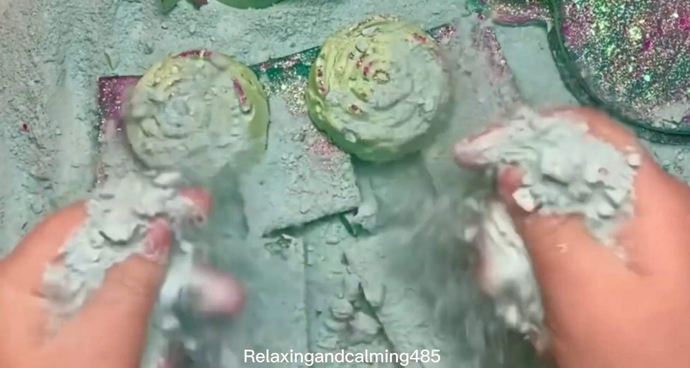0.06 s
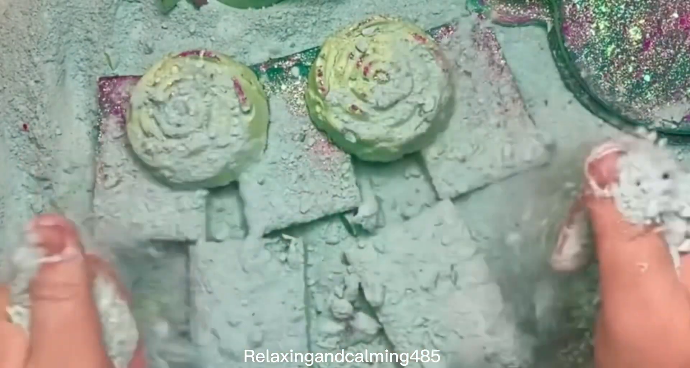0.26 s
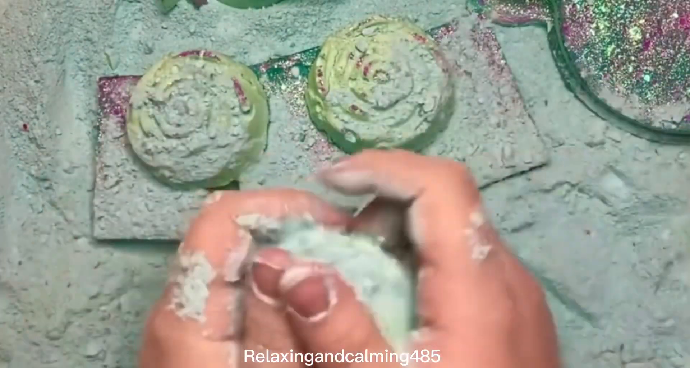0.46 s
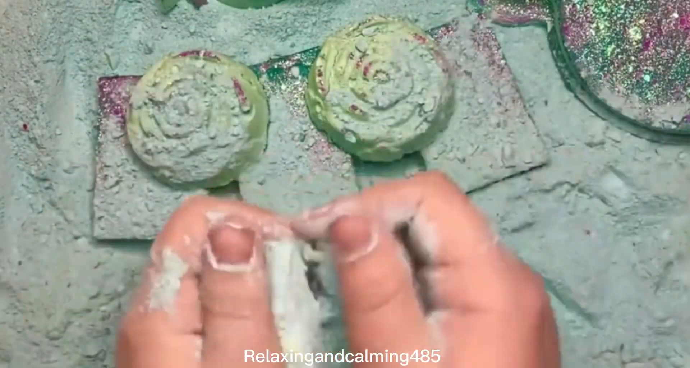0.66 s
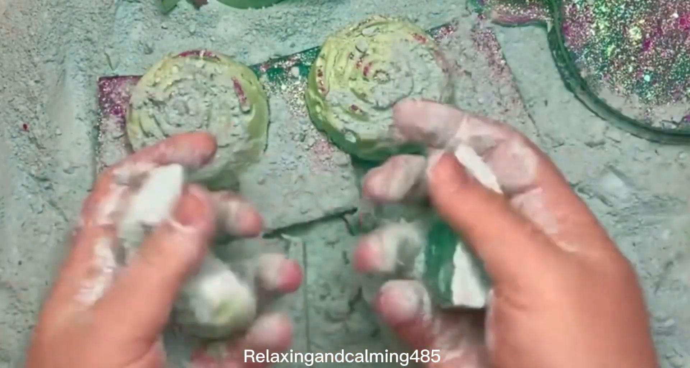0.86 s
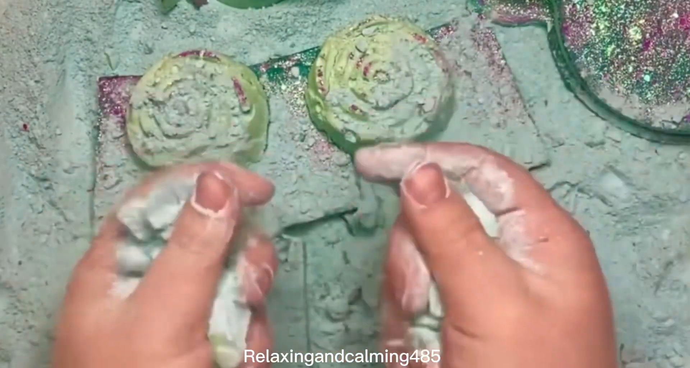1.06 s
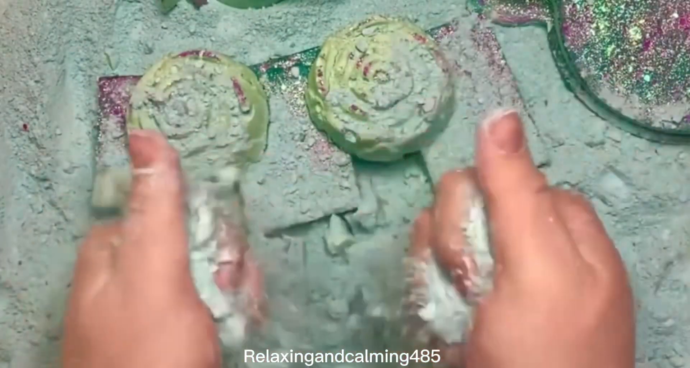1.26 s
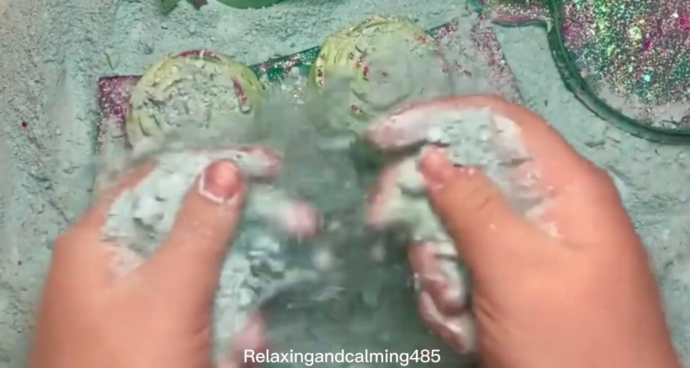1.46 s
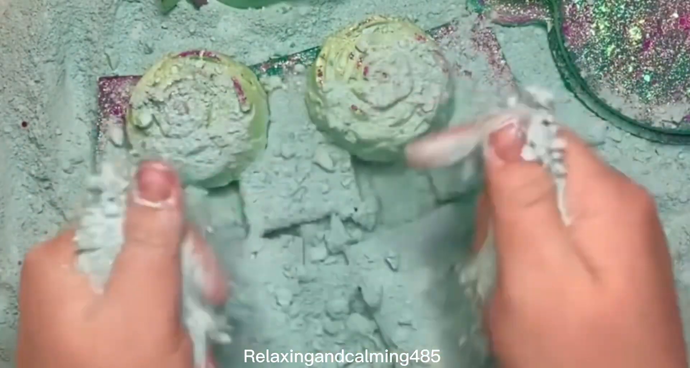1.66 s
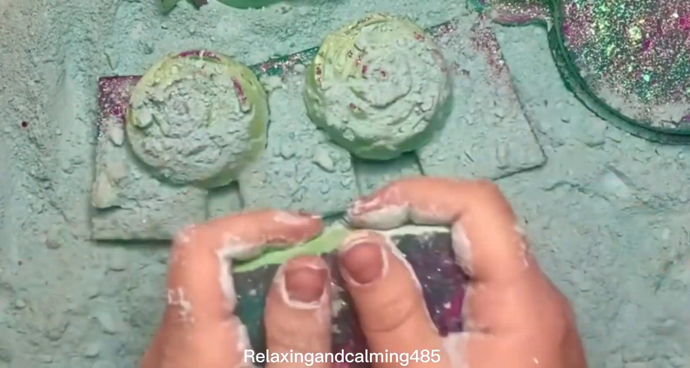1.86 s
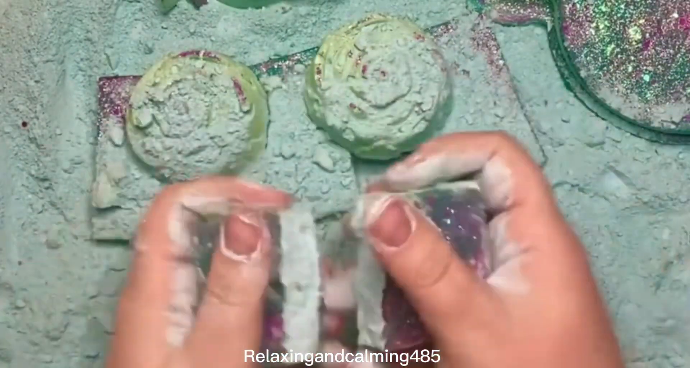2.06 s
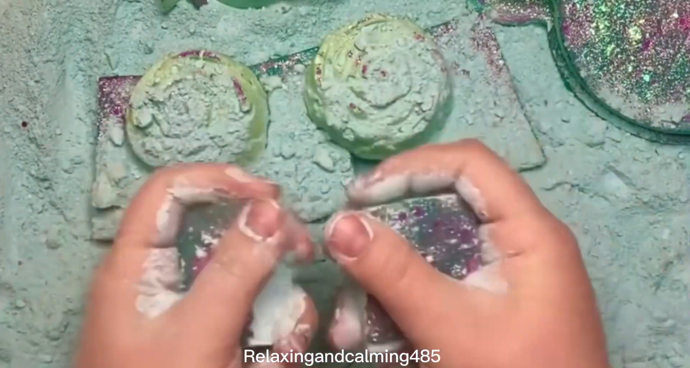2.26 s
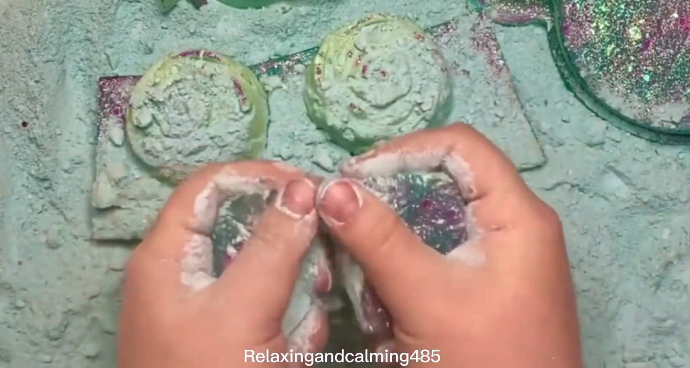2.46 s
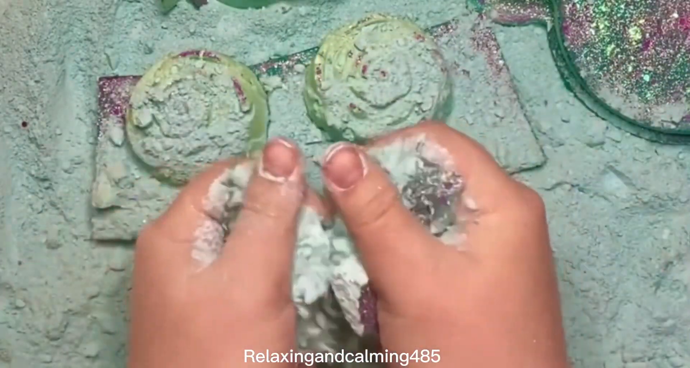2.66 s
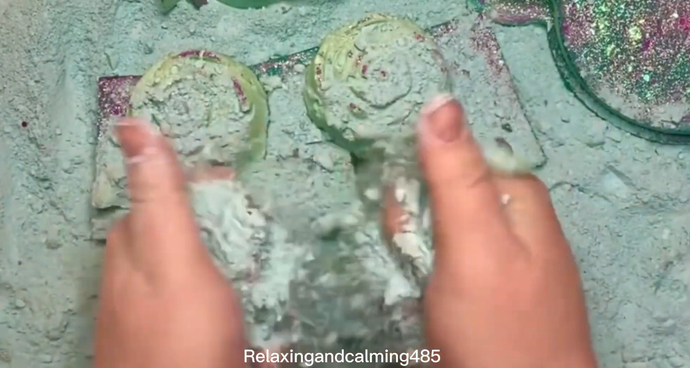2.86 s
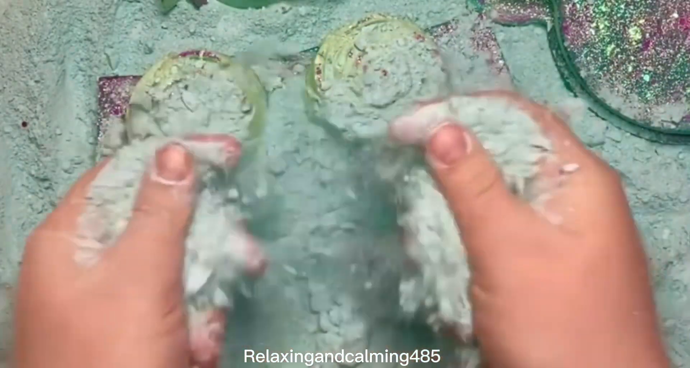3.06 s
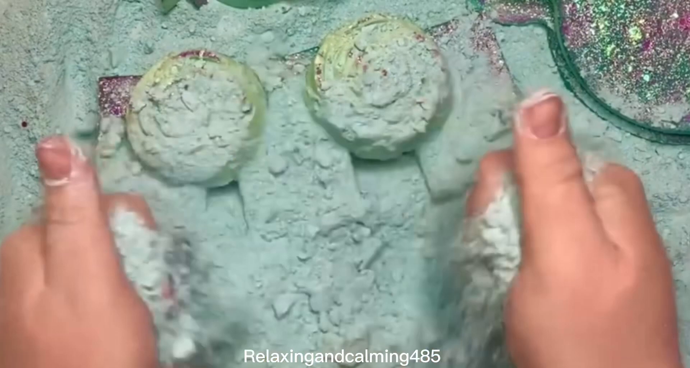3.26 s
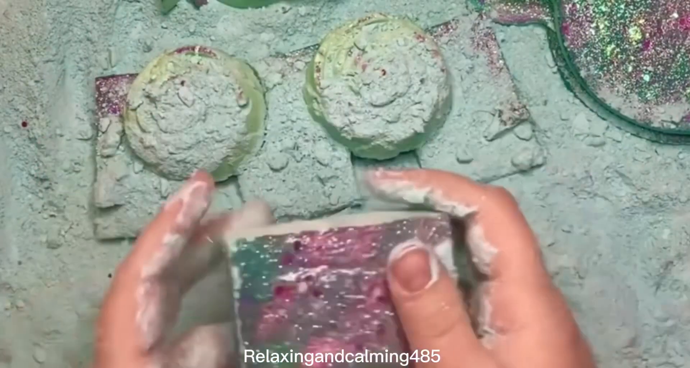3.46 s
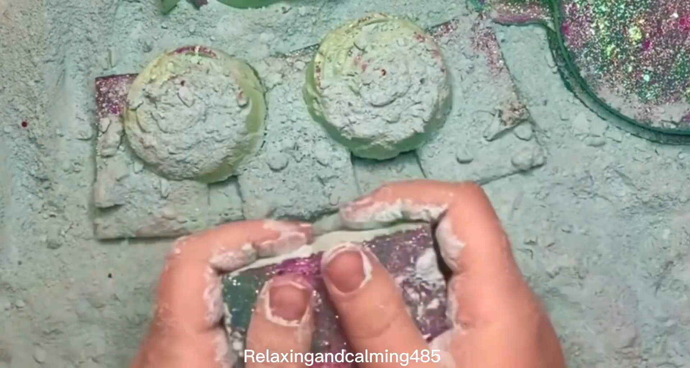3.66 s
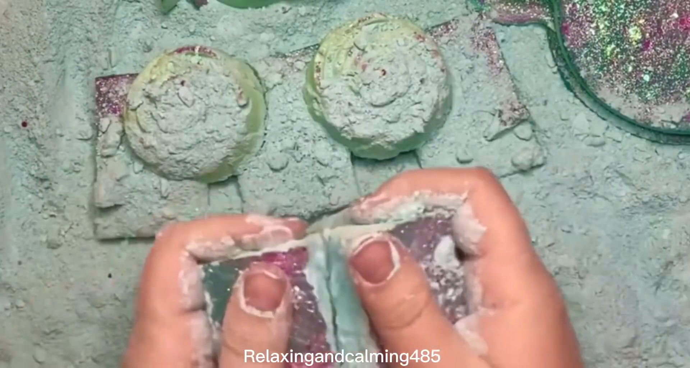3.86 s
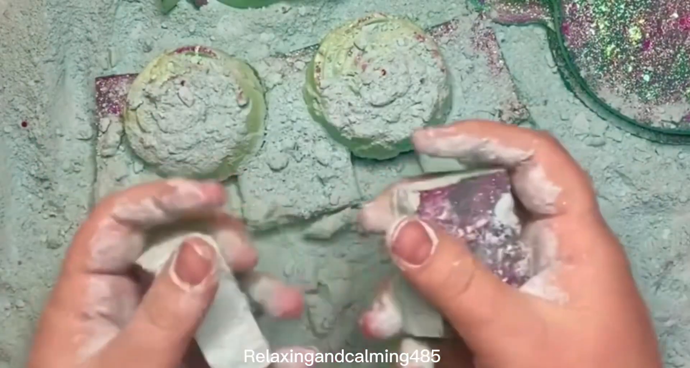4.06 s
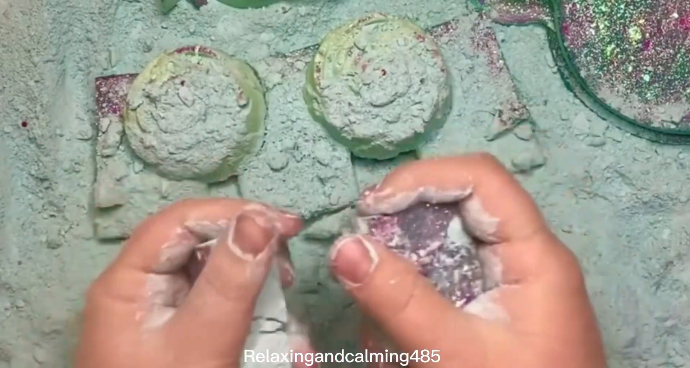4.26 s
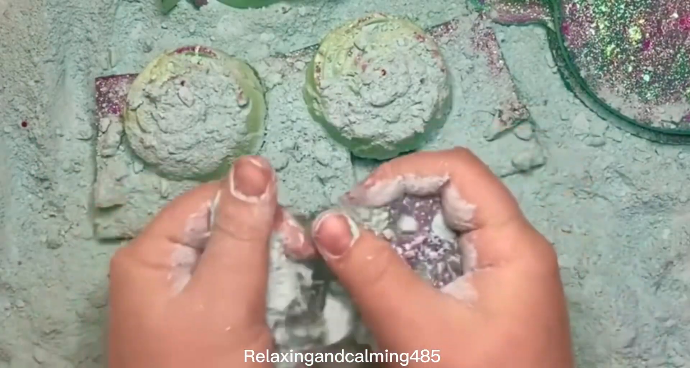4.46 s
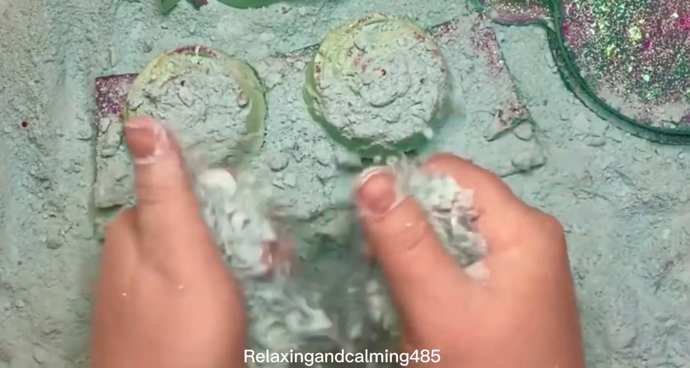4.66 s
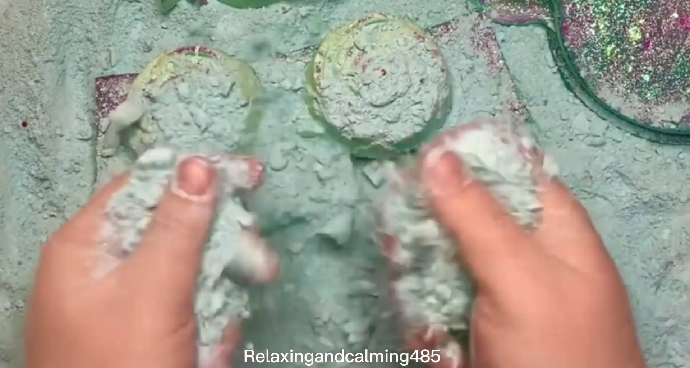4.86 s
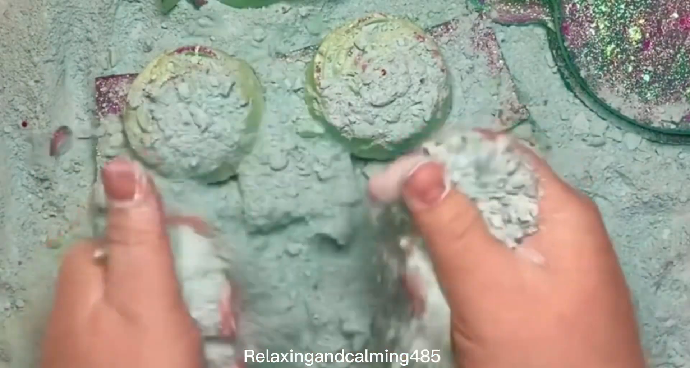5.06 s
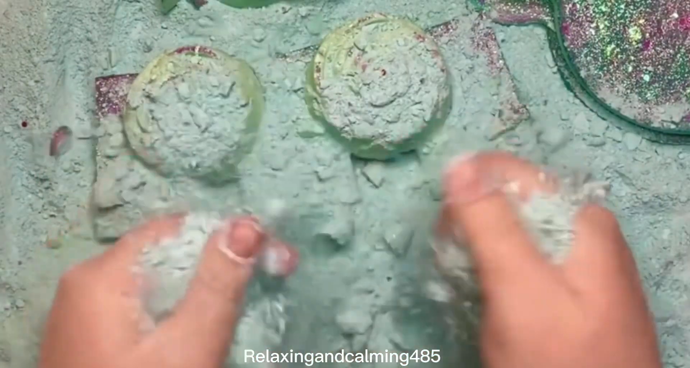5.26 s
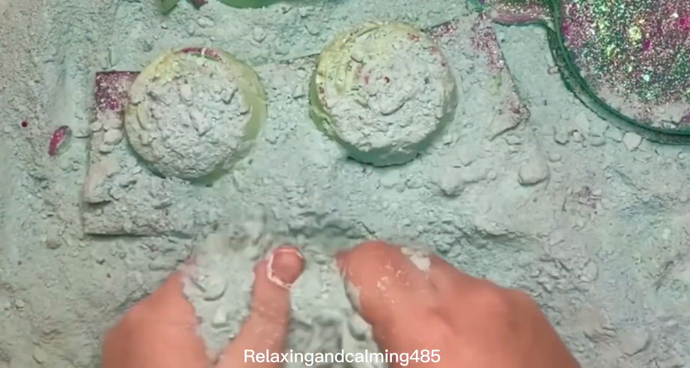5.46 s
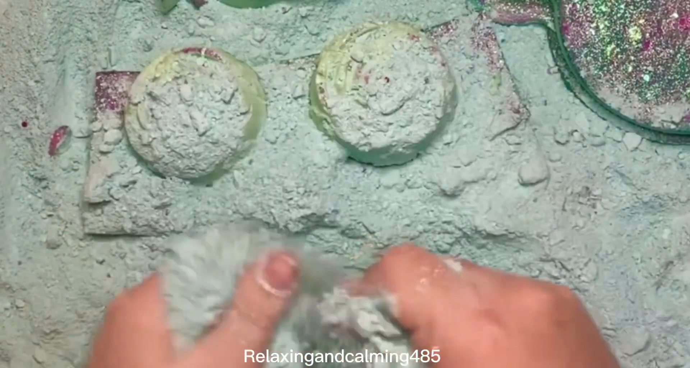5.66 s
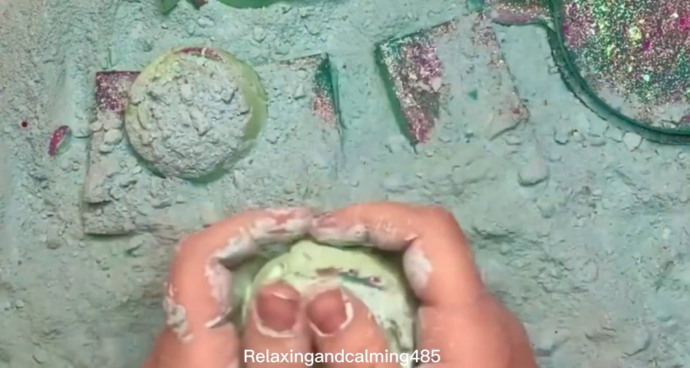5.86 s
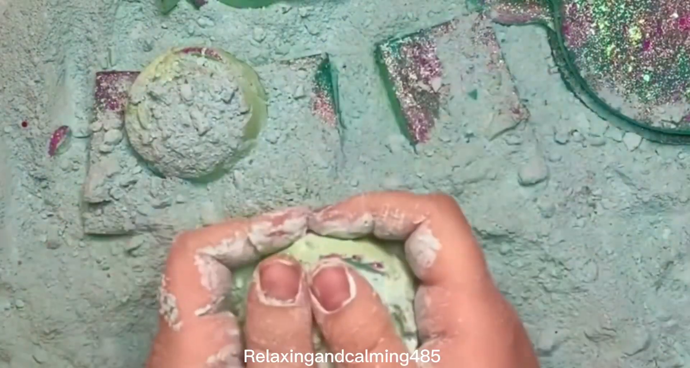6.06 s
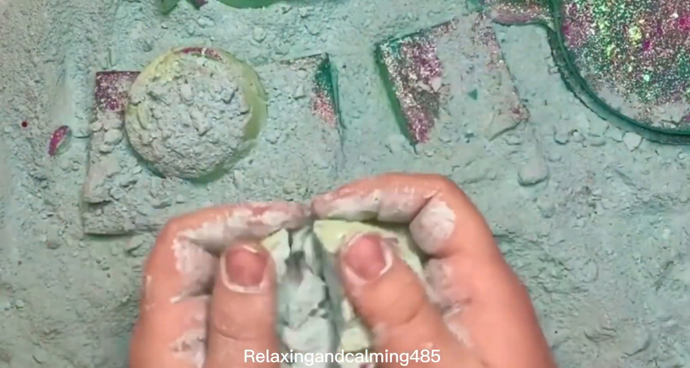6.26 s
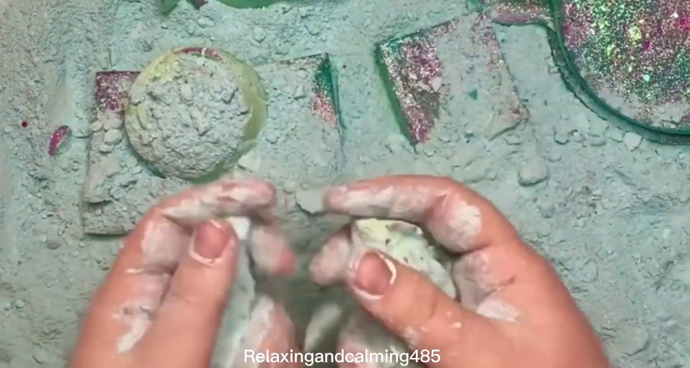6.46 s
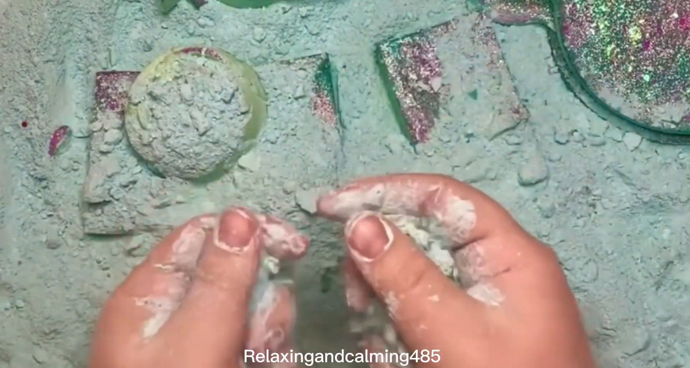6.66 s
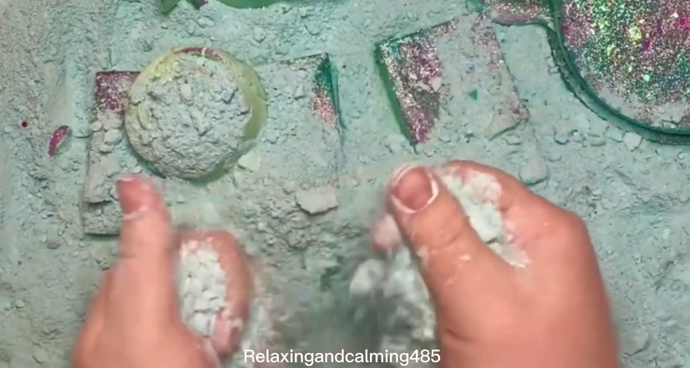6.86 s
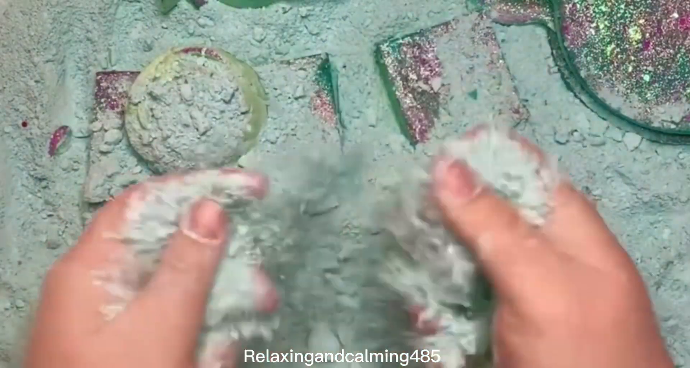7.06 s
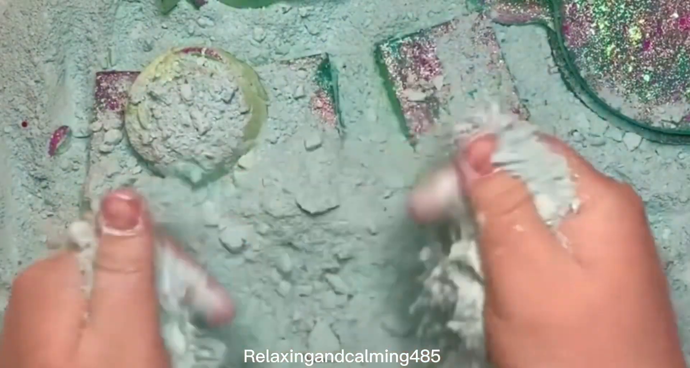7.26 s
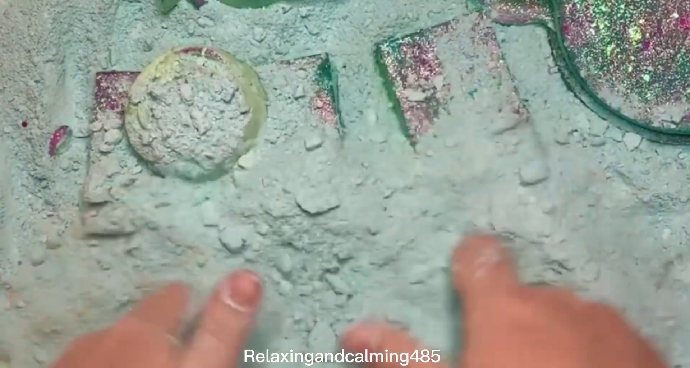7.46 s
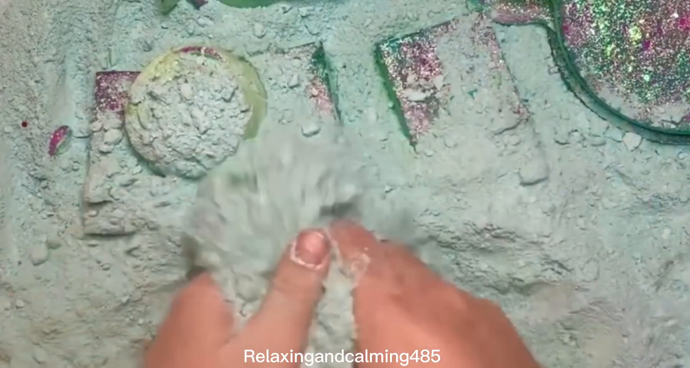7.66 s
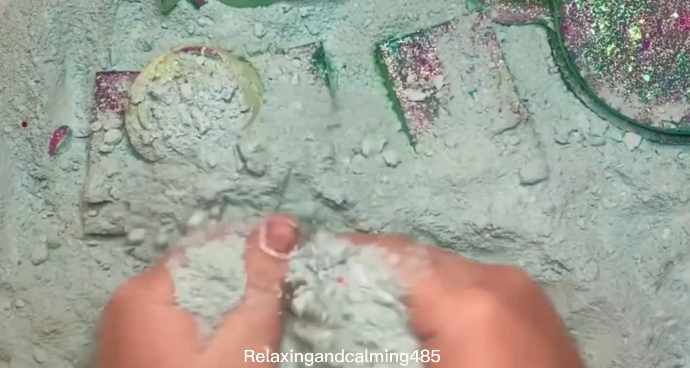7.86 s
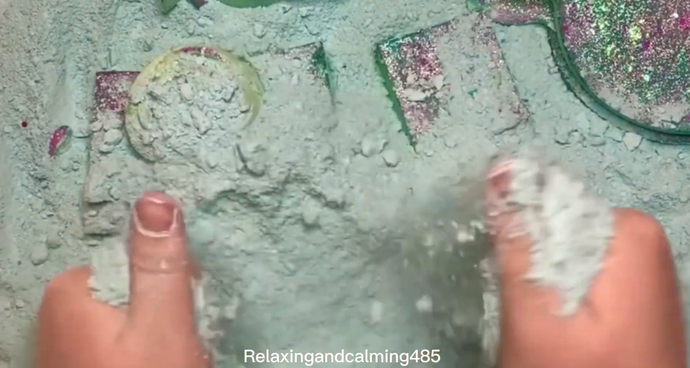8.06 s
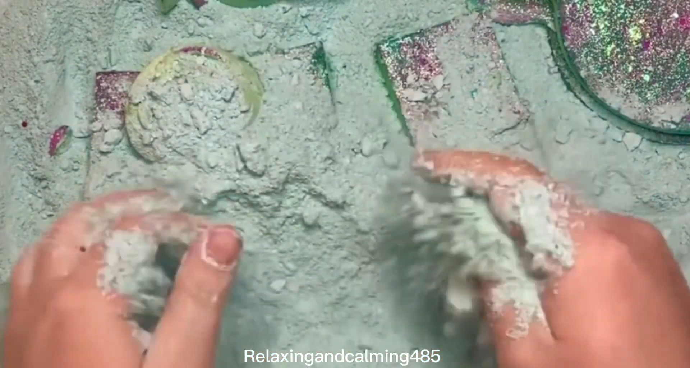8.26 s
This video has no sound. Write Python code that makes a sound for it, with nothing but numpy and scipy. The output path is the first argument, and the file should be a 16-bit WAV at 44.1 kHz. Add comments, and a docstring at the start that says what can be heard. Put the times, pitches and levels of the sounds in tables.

```python
"""Two hands crush dry chalk close by in a small room. A snap opens, then kneading crackle and crunches; at 0.6 s
packed powder first creaks and squeaks. More snaps (damped swings plus torn grit) follow up to 6.4 s, the strongest
near 4.2 s, with creaks (rough stick-slip hiss) between; from then on grains (tiny clicks over hiss) only crunch and
crumble. Soft thuds (low noise bursts) fall throughout; a faint echo and steady noise lie behind. The sound drops out
briefly near 0.45, 1.78, 3.45 and 5.88 s."""
import sys
import numpy as np
from scipy import signal
from scipy.fft import rfft, irfft
from scipy.io import wavfile
from scipy.ndimage import uniform_filter1d, map_coordinates

SR = 44100
rng = np.random.default_rng(int(sys.argv[2]) if len(sys.argv) > 2 else 0)


def persist_wave(psi):
    """Save psi, clipped to +-1, as 16-bit WAV."""
    counts = np.round(np.clip(psi, -1, 1) * 32767).astype(np.int16)
    wavfile.write(sys.argv[1], SR, np.atleast_2d(counts).T)


N = 366471
TOP_HZ = 16000
# crunch and chip balance: lumps, crumbs, powder [level/dB]
CRUNCH_BALANCE_DB = [.5, -0.5, -1]


def amp(db):
    """Decibels to gain."""
    return 10 ** (np.asarray(db) / 20)


def unit(x):
    """Each row at rms 1."""
    return x / np.sqrt(np.mean(x ** 2, axis=-1, keepdims=True) + 1e-20)


def dose(x):
    """Each row with the energy of 10 ms at rms 1."""
    return unit(x) * np.sqrt(SR / 100 / x.shape[-1])


def add(track, start_s, x):
    """Mix x into the track from start_s."""
    part = track[round(start_s * SR):][:len(x)]
    part += x[:len(part)]


def wobble(knots_per_s):
    """Smooth random curve through normally distributed knots."""
    knots = rng.standard_normal(int(N * knots_per_s / SR) + 4)
    return map_coordinates(knots, [np.arange(N) * knots_per_s / SR])


def band(x, lo_hz, hi_hz):
    """Causal band-pass, upper edge at most TOP_HZ."""
    sos = signal.butter(2, [lo_hz, min(hi_hz, TOP_HZ)], "band", fs=SR, output="sos")
    return signal.sosfilt(sos, x)


def coloured(x, points, size=4096):
    """Minimum-phase filter through (f/Hz, gain/dB) points, by folding the cepstrum."""
    hz, db = np.transpose(points)
    grid_hz = np.fft.rfftfreq(size, 1 / SR) + 1
    gain = amp(np.interp(np.log(grid_hz), np.log(hz), db))
    cepstrum = irfft(np.log(gain))
    cepstrum[1:size // 2] *= 2
    cepstrum[size // 2 + 1:] = 0
    impulse = irfft(np.exp(rfft(cepstrum)))
    return signal.fftconvolve(x, impulse)[:N]


def press(t, length_s, rise_s, sag_db_per_s, fall_db_per_s):
    """Gain of one push of the fingers: builds up, sags as the chalk yields, dies on letting go."""
    release_s = np.maximum(t - length_s, 0)
    return np.minimum(t / rise_s, 1) * amp(-sag_db_per_s * t - fall_db_per_s * release_s)


def sizes(db, fineness_db, crumbs_db, mix_db):
    """Gains of lumps, crumbs, powder: fineness trades lumps for powder; extra crumbs take from both."""
    fineness = fineness_db * np.array([-1, 0, 1])
    crumbs = crumbs_db * np.array([-.5, 1, -.5])
    return amp(db + np.array(mix_db) + fineness + crumbs)


def cupped(x, depth_db, width_hz, hold_s, size=512):
    """Moving fingers enclose small cavities: narrow resonances come and go, one random knot per hold_s."""
    hz, t, z = signal.stft(x, SR, nperseg=size)
    knots = np.clip(rng.standard_normal((size // 2, size)), -2, 2)
    where = np.meshgrid(hz / width_hz, t / hold_s, indexing="ij")
    field = map_coordinates(knots, where, order=1, mode="mirror")
    # small cavities leave long waves alone
    depth = depth_db * (hz / (hz + 700))[:, None]
    return signal.istft(z * amp(depth * field), nperseg=size)[1][..., :N]


def fractures(breaks_per_s, spread_db, octaves, dust, count=4, size=4):
    """Tiny breaks of random strength and pitch over dust hiss: rms-1 rows of lumps, crumbs, powder."""
    # edges between the ranges of lumps, crumbs and powder [f/Hz]
    range_edges_hz = [50, 900, 3500, 16500]
    # colour of crumbling chalk [f/Hz, gain/dB]
    chalk_colour = [(40, -2.5), (100, -0.5), (170, -7), (330, -3), (500, -11), (750, -7), (1150, -13),
                    (1900, -12), (2900, -15), (4100, -22.5), (5600, -18), (6800, -20.5), (10000, -29),
                    (15500, -28)]
    n = int(breaks_per_s * N / SR)
    strength = amp(spread_db * np.minimum(rng.standard_normal((n, 1)), 2.5))
    pitch = rng.uniform(np.log2(range_edges_hz[0]), np.log2(range_edges_hz[-1]) + 1, (n, 1))
    # each break is a few cracks, mostly within 2 ms
    delay = rng.exponential(.0007 * SR, (n, size))
    at = (rng.integers(0, N, (n, 1)) + delay).astype(int) % N
    cracks = strength * rng.choice([-1, 1], (n, size)) * .5 ** (np.arange(size) / size)
    layers = []
    for lo, hi in zip(range_edges_hz, range_edges_hz[1:]):
        edges, layer = np.geomspace(lo, hi, count + 1), 0
        for a, b in zip(edges, edges[1:]):
            # a fragment sounds around its own pitch
            tint = np.exp(-((np.log2(a * b) / 2 - pitch) / octaves) ** 2)
            clicks = unit(np.bincount(at.ravel(), (cracks * tint).ravel(), N))
            # finer grains merge into more hiss
            hiss = dust * (1 + a / 8000) * rng.standard_normal(N)
            # neighbouring bands alternate in sign
            layer = band(unit(clicks + hiss), a, b) - layer
        layers.append(coloured(layer, chalk_colour))
    return unit(np.array(layers))


def snaps():
    """A block parts at once: one damped swing of the halves, grit tearing off the broken faces."""
    # clean breaks, levels ahead of the common trim; crack = crumbs, grit = powder
    # [t/s, knock f/Hz, knock width/octaves, knock level/dB, crack level/dB, grit level/dB]
    snap_events = [(0.069, 437, 1.9, -24.5, -39, -49), (1.1872, 1900, 0.15, -22.5, -28, -43),
                   (1.8491, 362, 2.2, -23.5, -33.5, -32), (2.245, 304, 1.6, -21.5, -36, -33),
                   (2.316, 654, 1.9, -26, -32, -40), (2.4085, 520, 2, -23, -27.5, -31),
                   (3.7171, 500, 2, -22, -34, -31), (4.153, 510, 1.8, -15.5, -31, -26.5),
                   (4.2395, 900, 1.7, -21, -24.5, -31), (5.4041, 520, 3.8, -23.5, -38.5, -46.5),
                   (5.5844, 790, 3, -28.5, -29, -42), (5.7392, 1000, 1.5, -31, -45, -60),
                   (6.4128, 445, 2.8, -28.5, -34, -27)]
    trim_db = -1.0
    out, t = np.zeros(N), np.arange(SR // 10) / SR
    grains = fractures(breaks_per_s=9000, spread_db=3.5, octaves=1.3, dust=0.7)
    tear = (1 - np.exp(-t / 0.00074)) * (np.exp(-t / 0.0024) + 0.021 * np.exp(-t / .009))
    for start_s, hz, octaves, knock_db, *grit_db in snap_events:
        half = 2 ** (octaves / 2)
        # the load lets go within about half a swing
        release = np.sin(np.pi * np.minimum(t * hz / 0.52, 1)) ** 2
        b, a = signal.butter(1, [hz / half, hz * half], "band", fs=SR)
        swing = signal.lfilter(b, a, release)
        # a nearby surface returns the knock after 2.8 ms
        swing = swing + 0.32 * np.interp(t - .0028, t, swing, left=0)
        knock = amp(knock_db) * dose(band(swing, 73, TOP_HZ))
        torn = tear * grains[1:, round(start_s * SR):][:, :len(t)]
        add(out, start_s, knock + amp(grit_db) @ dose(torn))
    return out * amp(trim_db)


def crunches(grip):
    """A fracture front runs through a piece: a dense burst of breaks, sharp at first, then dying out."""
    # bursts of small fractures, level ahead of the size balance [t/s, length/s, level/dB, fineness/dB]
    crunch_events = [(0.2108, .002, -41.5, -4), (.475, 0.029, -33, -3.5), (.604, .01, -46.5, 10),
                     (.853, 0.016, -31.5, 2), (.879, .006, -27, 1), (.912, 0.0065, -35.5, -1),
                     (.959, 0.0054, -35, -6), (.99, .009, -26.5, -1.5), (1.053, 0.0088, -37, 1),
                     (1.268, .009, -41, -5), (2.183, .006, -45, 6), (2.202, .01, -33, 1.5),
                     (2.234, 0.0079, -30.5, 0), (2.28, .005, -34, -1), (2.291, .005, -36, -4),
                     (2.3058, .0035, -30.5, -2), (2.343, .003, -39, 4), (2.414, 0.014, -35.5, 0),
                     (2.501, 0.0053, -31, 2.5), (2.638, .005, -38.5, -5), (2.712, .007, -34.5, 5),
                     (3.671, 0.0029, -50, 1.5), (4.087, 0.014, -32.5, 4.5), (4.151, 0.0076, -28.5, 0.5),
                     (4.361, .003, -37, -0.5), (4.372, 0.011, -33.5, -3), (4.499, .006, -36, -3),
                     (4.575, 0.0043, -32, -2.5), (4.808, .004, -36.5, -1.5), (5.579, 0.015, -30, -3.5),
                     (5.688, .009, -45.5, -8), (6.026, .033, -35.5, -2.5), (6.196, .005, -44.5, 4.5),
                     (6.455, .003, -33, -3.5), (6.464, 0.0054, -32.5, -1), (6.5, .004, -37, -2.5),
                     (6.567, .005, -35.5, -0.5), (6.596, .003, -32, 1), (6.646, .008, -37, -1.5),
                     (7.799, .0075, -39, -7)]
    # short bursts favour crumbs, long ones grind all sizes
    ordinary_s, crumbs_db_per_halving = .007, 2
    out, t = np.zeros(N), np.arange(SR // 10) / SR
    grains = fractures(breaks_per_s=6000, spread_db=4.5, octaves=1.27, dust=0.36)
    grains = cupped(grains, depth_db=3.5, width_hz=389, hold_s=.04)
    bursts = []
    for start_s, length_s, db, fineness_db in crunch_events:
        crumbs_db = crumbs_db_per_halving * np.log2(ordinary_s / length_s)
        bursts.append((start_s, length_s, sizes(db, fineness_db, crumbs_db, CRUNCH_BALANCE_DB)))
    for start_s, length_s, gains in bursts + chips(grip):
        front = (1 - np.exp(-t / (0.037 * length_s))) * np.exp(-(t / length_s) ** 2.3)
        burst = front * grains[:, round(start_s * SR):][:, :len(t)]
        add(out, start_s, gains @ dose(burst))
    return out


def chips(grip):
    """Stray small fractures scaled by the knead's gain: rows of (t/s, length/s, gains)."""
    chips_per_s, length_s = 9, .002
    # level relative to the knead, fineness, scatter of both
    level_db, chip_fineness_db, scatter_db = -5, 2.5, 3
    starts = rng.integers(0, N - SR // 10, int(chips_per_s * N / SR))
    chance = rng.standard_normal((len(starts), 2)).clip(-2, 2) * scatter_db
    rows = []
    for i, (db, fineness_db) in zip(starts, chance):
        gains = sizes(level_db + db, chip_fineness_db + fineness_db, 0, CRUNCH_BALANCE_DB)
        rows.append((i / SR, length_s, grip[:, i] * gains))
    return rows


def kneading():
    """Gain over time of lumps, crumbs, powder as fingers close on handful after handful."""
    # pushes of the fingers, level ahead of the size balance [t/s, length/s, level/dB, fineness/dB]
    knead_events = [(-.05, .16, -43, -1.5), (.12, .37, -45.5, -1), (.57, .26, -55, 2), (.83, .37, -39, 1),
                    (1.24, 0.068, -44.5, 1), (1.35, .15, -42.5, 0), (1.53, .13, -45.5, -1),
                    (1.68, 0.12, -50.5, 2), (1.94, .22, -57, 3), (2.18, .11, -45, 1.5),
                    (2.31, .12, -39, -.5), (2.47, .29, -40.5, .5), (2.79, .22, -42.5, 1),
                    (3.039, .12, -41.5, 0), (3.17, .25, -49, 1), (3.47, .2, -61, 2),
                    (3.82, .24, -57.5, 1.5), (4.129, 0.34, -40.5, 1), (4.45, 0.2, -42.5, .5),
                    (4.689, 0.16, -41.5, 0), (4.87, 0.2, -41.5, -1), (5.119, .22, -44.5, -1),
                    (5.37, .18, -50, -3.5), (5.57, 0.095, -45.5, -3.5), (5.729, 0.099, -46.5, -3.5),
                    (6.14, .21, -50, 1.5), (6.37, 0.14, -43.5, 1), (6.53, .11, -37.5, 0),
                    (6.67, .1, -42, 0), (6.8, .28, -44.5, -.5), (7.1, .06, -44, 2.5), (7.19, .08, -55, 1),
                    (7.29, .15, -51, -7), (7.43, .2, -49, -4), (7.669, 0.26, -44.5, -1.5),
                    (7.98, .27, -49.5, -.5)]
    # balance of lumps, crumbs, powder [level/dB]
    knead_balance_db = [1, 0, -1.5]
    rise_s, sag_db_per_s, fall_db_per_s = 0.036, 8.5, 142
    # a harder knead breaks off more crumbs
    ordinary_db, crumbs_db_per_db = -46, .18
    # powder rustles on the fingers between kneads
    rest_db, rest_fineness_db = -62.5, 1.5

    def mix(db, fineness_db):
        """Size gains for one knead level."""
        return sizes(db, fineness_db, crumbs_db_per_db * (db - ordinary_db), knead_balance_db)

    power = np.outer(mix(rest_db, rest_fineness_db) ** 2, np.ones(N))
    t = np.arange(SR) / SR
    for start_s, length_s, db, fineness_db in knead_events:
        push = press(t, length_s, rise_s, sag_db_per_s, fall_db_per_s)
        # a push begun before time 0 enters part-way
        heard = push[t >= -start_s]
        for track, gain in zip(power, mix(db, fineness_db)):
            add(track, max(start_s, 0), (gain * heard) ** 2)
    return np.sqrt(power)


def crumbling(grip):
    """Grains grind together: hard squeezing crackles as grit, loose falling is mostly smooth powder."""
    # all grit at this crumb level; less over the range below it, at least a fifth
    gritty_db, gritty_range_db = -37.5, 16
    slips = amp(1.1 * wobble(20) + 1.7 * wobble(160))
    grit = slips * fractures(breaks_per_s=1100, spread_db=6.5, octaves=1.2, dust=.6)
    powder = fractures(breaks_per_s=2000, spread_db=5.5, octaves=1, dust=1)
    crumbs_db = 20 * np.log10(grip[1])
    share = np.clip(1 + (crumbs_db - gritty_db) / gritty_range_db, .2, 1)
    grains = np.sqrt(share) * unit(grit) + np.sqrt(1 - share) * powder
    grains = unit(cupped(grains, depth_db=4.0, width_hz=198.7, hold_s=.03))
    return np.sum(grip * grains, axis=0)


def brightened(x):
    """The top treble slowly grows and fades from handful to handful."""
    # treble gain above edge_hz [t/s, level/dB]
    treble_points = [(0, 0), (1.6, 2.5), (2.4, .5), (3.2, 3), (6.7, -3.5), (7.1, 1.5)]
    edge_hz = 7800
    top = signal.sosfiltfilt(signal.butter(4, edge_hz, "high", fs=SR, output="sos"), x)
    gain_db = np.interp(np.arange(N) / SR, *np.transpose(treble_points))
    return x + top * (amp(gain_db) - 1)


def creaking():
    """Packed powder sticks and slips very fast: rough high hiss, at times narrowing to a squeak."""
    # powder under pressure [t/s, length/s, level/dB]
    squeeze_events = [(0.594, 0.018, -39.5), (.67, .1, -41), (1.94, 0.078, -35), (2.065, 0.072, -39.5),
                      (3.459, 0.022, -42), (3.514, 0.094, -43.5), (3.808, .2, -35), (6.188, 0.036, -36.5),
                      (6.242, 0.14, -42.5)]
    # squeaks of packed powder, centred on t [t/s, length/s, f/Hz, level/dB]
    squeak_events = [(0.61, .006, 7200, -34), (.7, .022, 5000, -42), (3.476, .012, 5500, -45),
                     (3.938, .0045, 7740, -26)]
    # colour of the creak [f/Hz, gain/dB]
    creak_colour = [(1500, -27), (3200, -13.5), (4500, -18.5), (5150, 0), (5550, -4.5), (6300, -2.5),
                    (7100, -8), (7900, -7), (8500, -12.5), (15500, -10.5)]
    rise_s, sag_db_per_s, fall_db_per_s = .025, 20, 190
    t, power = np.arange(SR) / SR, np.zeros(N)
    for start_s, length_s, db in squeeze_events:
        push = press(t, length_s, rise_s, sag_db_per_s, fall_db_per_s)
        add(power, start_s, (amp(db) * push) ** 2)
    slips = rng.standard_normal(N) * amp(1.7 * wobble(900) + 2.9 * wobble(90))
    ringing = cupped(coloured(slips, creak_colour), depth_db=5.5, width_hz=200, hold_s=.07)
    out = np.sqrt(power) * unit(ringing)
    around = np.arange(-SR // 10, SR // 10) / SR
    for centre_s, length_s, hz, db in squeak_events:
        tone = unit(band(rng.standard_normal(len(around)), hz - 200, hz + 200))
        swell = np.exp(-(around / length_s) ** 2)
        add(out, centre_s + around[0], amp(db) * swell * tone)
    return out


def thuds():
    """Soft landings of lumps and fingers shake the powder bed and the table: low noise bursts."""
    # landings, level as rms over the length [t/s, length/s, f/Hz, level/dB]
    thud_events = [(0.384, 0.054, 69.5, -41.5), (1.19, .09, 122, -41), (2.796, 0.11, 100, -39),
                   (4.5, .02, 254, -37), (5.801, 0.036, 90, -32.5), (6.804, 0.013, 278, -31.5),
                   (7.39, 0.16, 75, -39.5), (7.38, .17, 270, -42.5)]
    out, t = np.zeros(N), np.arange(SR // 2) / SR
    for start_s, length_s, hz, db in thud_events:
        burst = rng.standard_normal(len(t)) * np.exp(-(t / length_s) ** 2)
        push = band(burst, hz / 1.46, hz * 1.4)
        add(out, start_s, amp(db) * unit(push) * np.sqrt(length_s / t[-1]))
    return out


def room(x, t60_s, dull_hz):
    """Short, dull answer from table and walls: decaying noise after 3 ms."""
    t = np.arange(SR // 2) / SR
    noise = band(rng.standard_normal(len(t)), 144, dull_hz)
    tail = noise * amp(-60 * t / t60_s) * (t > .003)
    return signal.fftconvolve(x, tail / np.linalg.norm(tail))[:N]


def room_background():
    """Steady room noise, strongest in the lows."""
    # colour of the background [f/Hz, gain/dB]
    floor_colour = [(20, -2), (70, -3.5), (236, -15), (450, -25), (1260, -46), (6000, -31), (15000, -35)]
    return amp(-51.5) * unit(coloured(rng.standard_normal(N), floor_colour))


def scene():
    """Chalk close by, faint echo of its snaps and crunches, room background."""
    grip = kneading()
    hits = snaps() + brightened(crunches(grip))
    grinding = brightened(crumbling(grip))
    echo = amp(-17) * room(hits, t60_s=0.12, dull_hz=5400)
    return (hits + echo + grinding + creaking() + thuds() + room_background())[None]


def record(dry):
    """The sound cuts out for an instant now and then; nothing passes above TOP_HZ."""
    # dropouts [start t/s, end t/s]
    dropouts = [(.443, .453), (1.778, 1.786), (3.443, 3.451), (5.871, 5.889)]
    t = np.arange(N) / SR
    silent = sum((t > a) & (t < b) for a, b in dropouts)
    # 64-sample ramps at the edges
    live = uniform_filter1d(1. - silent, size=64)
    passed = np.fft.rfftfreq(2 * N, 1 / SR) < TOP_HZ
    return irfft(rfft(dry * live, 2 * N) * passed)[:, :N]


dry = scene()
out = record(dry)
persist_wave(out)
```